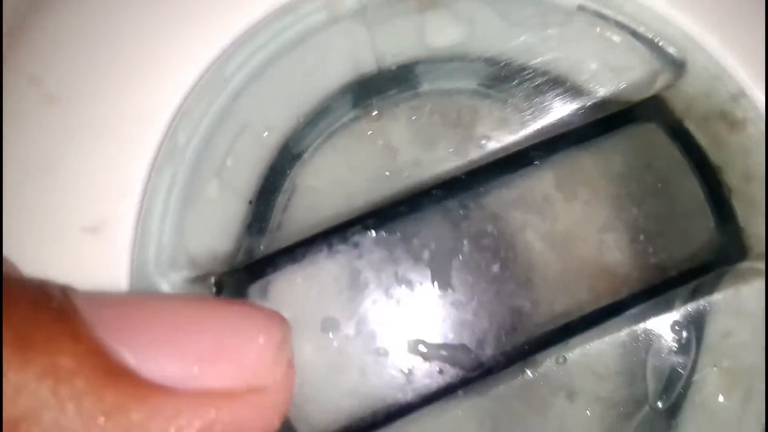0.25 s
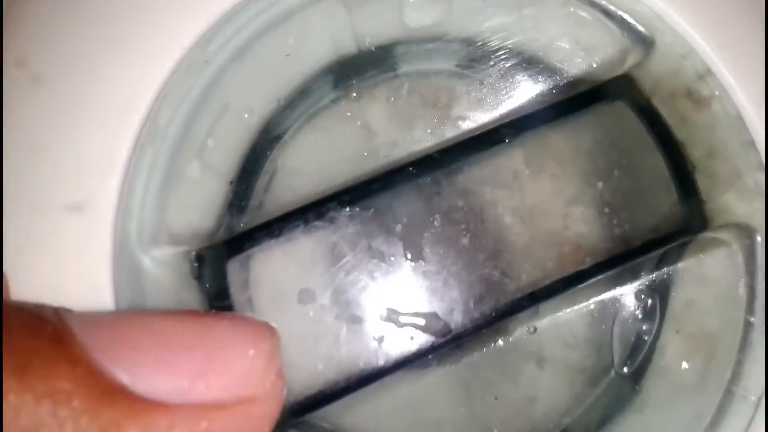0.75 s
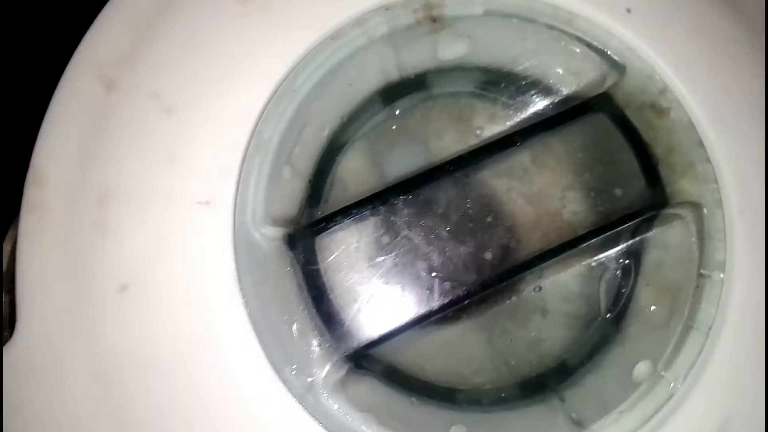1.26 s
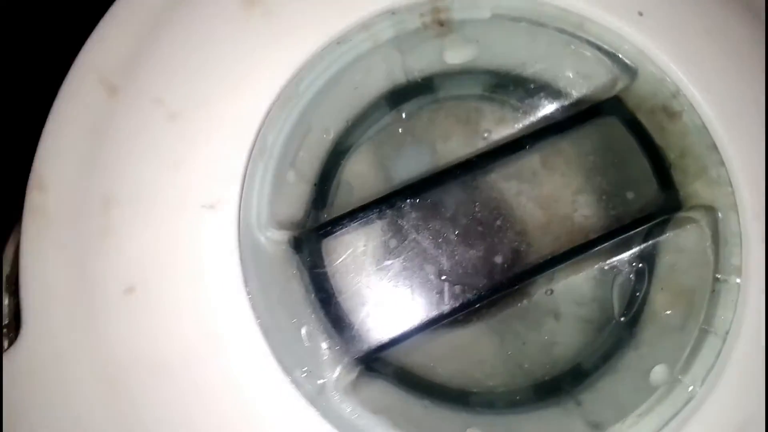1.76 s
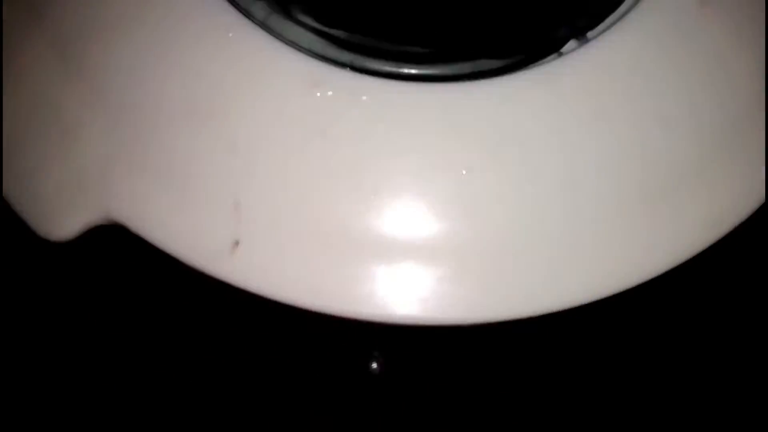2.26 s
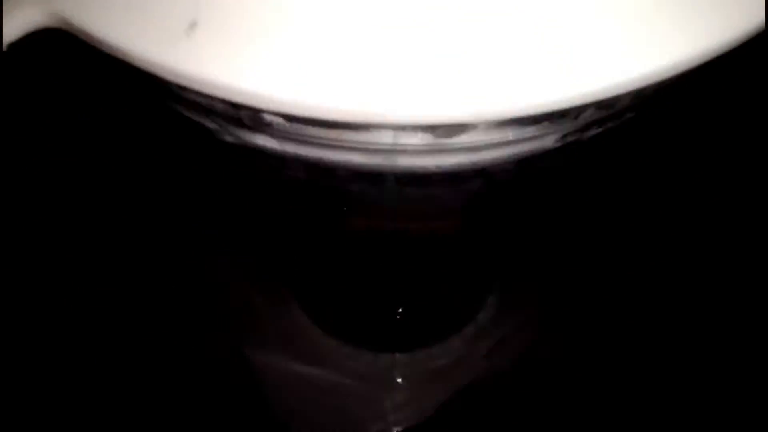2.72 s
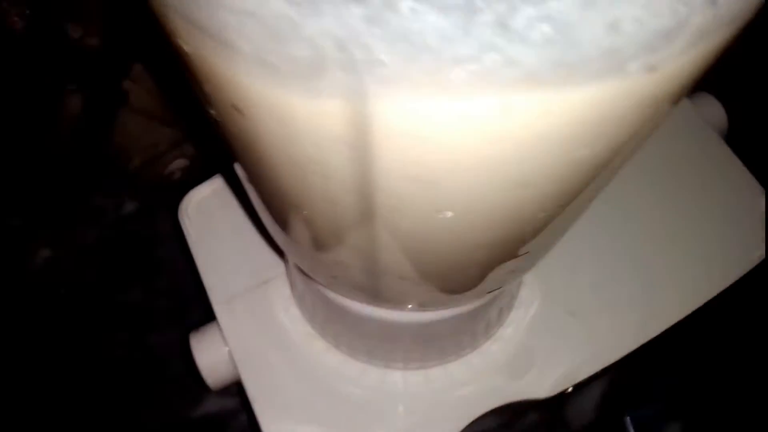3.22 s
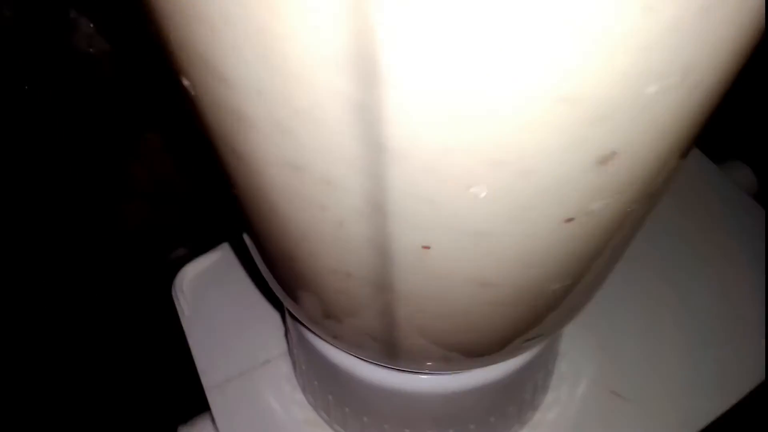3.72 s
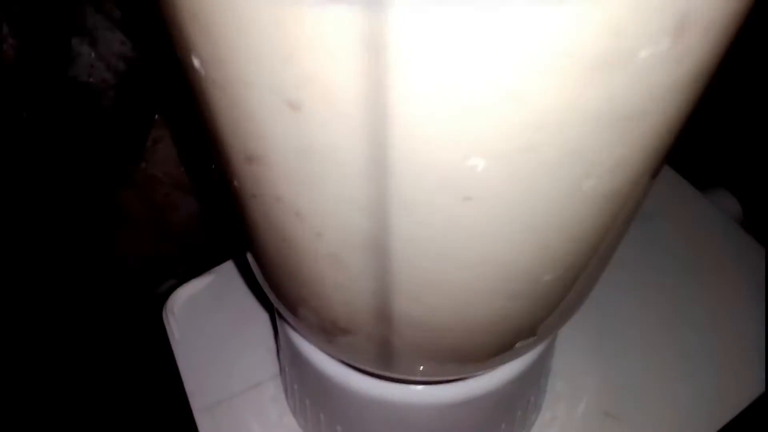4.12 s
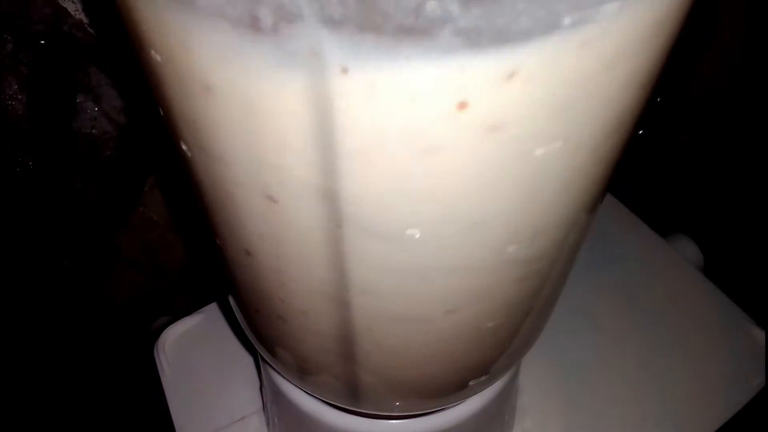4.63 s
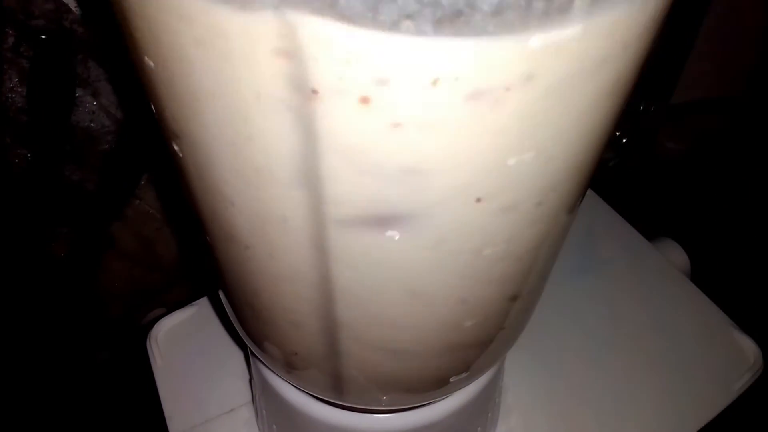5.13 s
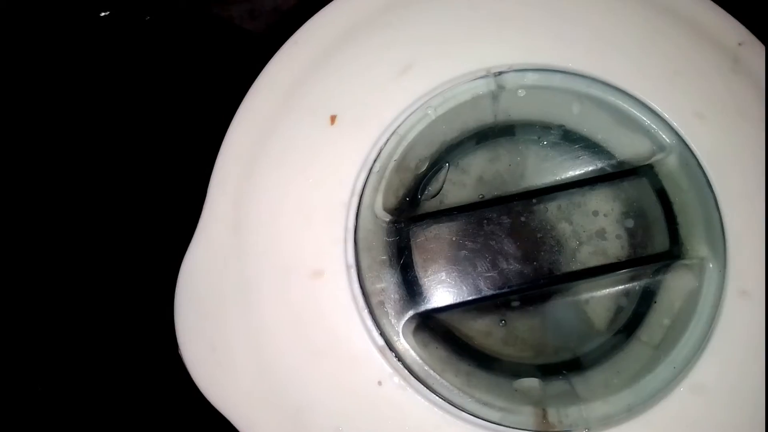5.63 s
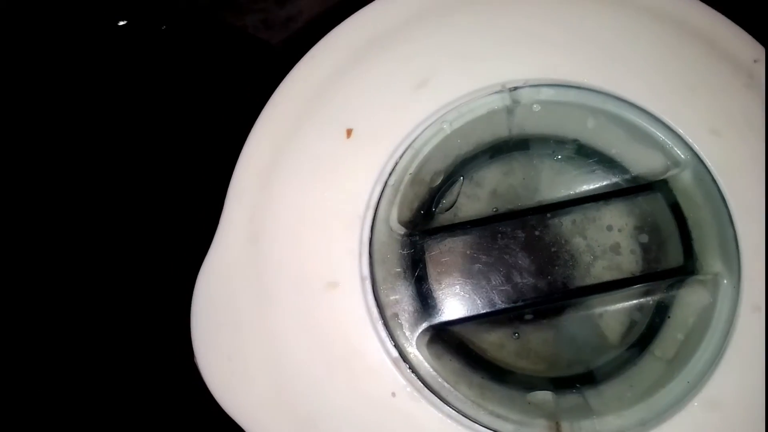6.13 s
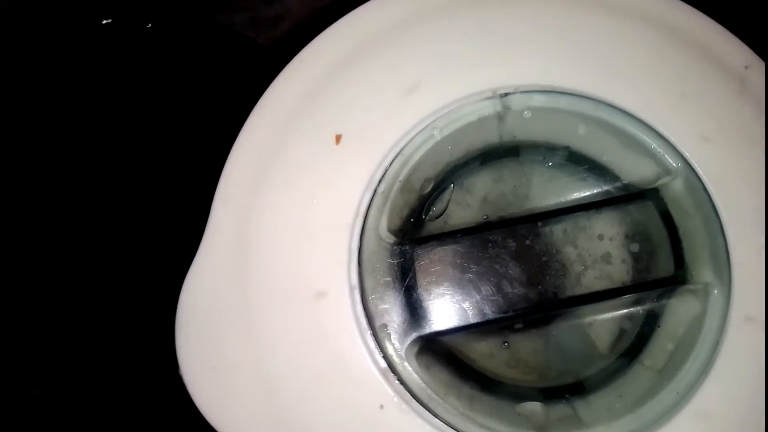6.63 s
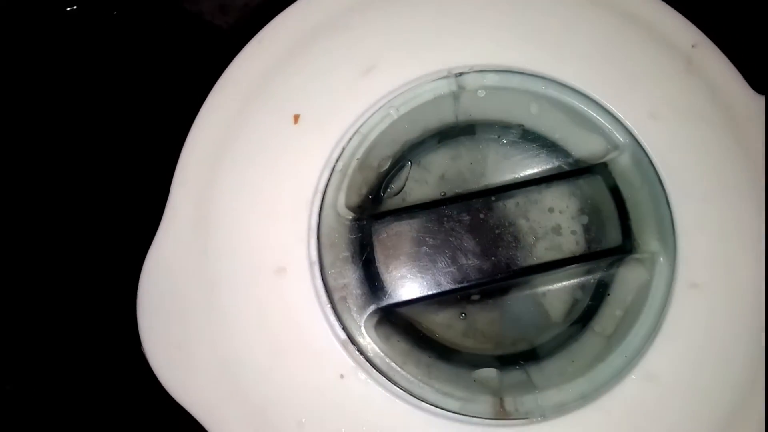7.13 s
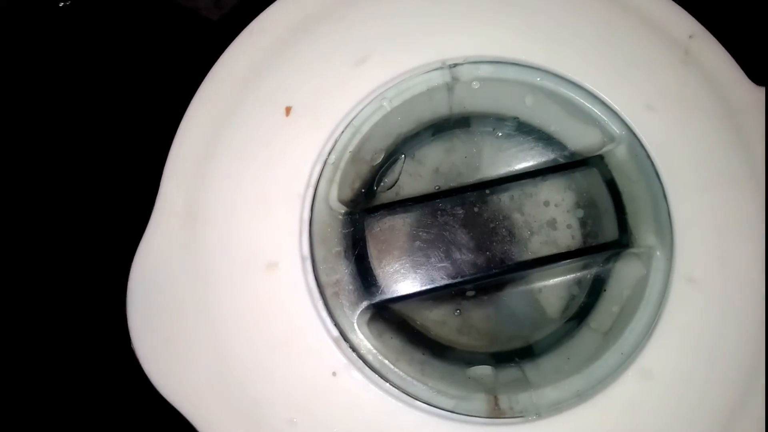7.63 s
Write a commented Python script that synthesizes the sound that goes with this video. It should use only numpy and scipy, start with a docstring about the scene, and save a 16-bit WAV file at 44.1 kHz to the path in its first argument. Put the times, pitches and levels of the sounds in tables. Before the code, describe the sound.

Close up, a blender whirs and grinds a lumpy liquid, drops briefly to silence, then runs more smoothly until it is switched off.

```python
"""In a kitchen, a blender runs at full speed while a close microphone moves from over the lid to the
side of the jug and back. The blades churn and grind, making the jug ring, in bursts when they strike
lumps. Droplets tick on the lid, the motor rumbles and hums, and its fan hisses. At the end the power
is cut and it starts to run down. The loudest peaks overload, and early on the sound cuts out for 0.8 s."""
import sys
import numpy as np
from scipy import signal
from scipy.fft import rfft, irfft, next_fast_len
from scipy.io import wavfile
from scipy.ndimage import map_coordinates

SR = 44100
rng = np.random.default_rng(int(sys.argv[2]) if len(sys.argv) > 2 else 0)


def put_to_file(sound):
    """Save the sound as 16-bit audio at rate SR, in the file named by the first command-line argument."""
    columns = np.atleast_2d(sound).T  # one column per channel
    safe = np.clip(columns, -1, 1)
    whole_steps = np.round(safe * 32767)
    wavfile.write(sys.argv[1], SR, whole_steps.astype(np.int16))


N = 347067
TIME = np.arange(N) / SR
POWER_OFF_S, COAST_S = 7.5, 0.7  # once off, the speed falls to about a third in COAST_S


# Pitches the jug and lid ring at, and how strong each is at the three microphone places.
# pitch_hz, width_hz, close_db, beside_db, above_db
JUG_RINGS = [(836, 162, -16.5, -15.5, -16), (1039.5, 84, -13.5, -15, -11.5), (1141, 340, -15.5, -20, -19),
             (1385, 76, -14, -5, -13), (1495.4, 53, -6, -4, -14), (1620, 55, -7.5, -4.5, -7.5),
             (1767, 63, -5, -4.5, -6), (1827, 95, -3.5, -3, -23), (1911.4, 65, 4, -1.5, 0),
             (1991, 62, -5, -12.5, -4.5), (2160, 120, -8, -11, -10), (2438, 210, -10.5, -23.5, -9),
             (2650, 58, -12.5, -19, -11.5), (2810.5, 130, -8.5, -21.5, -13.5), (2952, 26, -8.5, -19.5, -6),
             (3086, 98, -15.5, -13.5, -10), (3300, 110, -12.5, -26, -9.5), (3630, 213.4, -11, -7.5, -8),
             (3837, 230, -14.5, -2, -7.5), (4022, 130, -11, -2.5, -2), (4214, 98, -10, -9.5, -6),
             (4406, 238, -11.5, -9.5, -8.5), (4845, 290, -19, -15, -8.5), (5330, 220, -21.5, -18, -13.5),
             (5767, 110, -14.5, -21, -11.5)]

def blades_in_jug(lump_db, shaft_hz):
    """Swirling liquid, small hits and one knock per turn of the shaft make the jug ring."""
    turns = np.cumsum(shaft_hz + 3.5 * wobble(40)) / SR
    knocks = unit(np.diff(np.floor(turns), prepend=0) * amp(2.4 * wobble(300)))
    # Uneven blades: every other turn is louder.
    throb = 1 + .11 * np.cos(2 * np.pi * turns) + .12 * np.cos(np.pi * turns)
    swirl = throb * rng.standard_normal(N)
    churn = unit(swirl + .45 * ticks(900, 3.3) + .28 * knocks)
    roughness_db = at_place([1.1, .6, .5]) * (.65 * wobble(25) + 1.7 * wobble(90))
    churn *= amp(churning_db() + .98 * lump_db + roughness_db)
    return amp(16) * ring(churn, JUG_RINGS, sharpness=1.288, low_cut_hz=600, cut_slope=4)


# How the steady churning swells and sinks. time_s, level_db
CHURN_LEVEL = [(0, -13), (.6, -16), (.78, -16), (1.05, -13.5), (1.2, -11), (1.65, -9.5), (1.8, -11.5),
               (2.62, -9.5), (3.2, -9.5), (3.5, -9.5), (4.1, -8), (4.7, -9), (4.92, -11.5), (5.15, -9),
               (5.54, -8.5), (5.57, -11.5), (6.8, -11), (7.87, -11)]

def churning_db():
    """The churning loses 3.5 dB each time the blades' speed halves."""
    return curves(CHURN_LEVEL)[0] - 3.5 * speed_halvings()


# Big lumps caught by the blades. start_s, length_s, rise_db
BIG_LUMPS = [(0.016, 0.016, 10.5), (0.056, 0.023, 10.5), (0.09, 0.036, 6.5), (0.154, 0.0083, 8.5),
             (0.244, 0.0044, 6), (0.267, 0.02, 9.5), (0.306, 0.015, 8), (0.354, 0.017, 11.5),
             (0.404, 0.03, 7.5), (0.441, 0.062, 9.5), (0.491, 0.012, 3), (0.514, 0.011, 10),
             (0.568, 0.015, 12.5), (0.588, 0.026, 8), (0.619, 0.062, 14), (0.72, 0.0093, 10.5),
             (0.824, 0.024, 10.5), (0.873, 0.037, 6), (0.919, 0.0082, 10), (0.983, 0.023, 13.5),
             (1.038, 0.0081, 11), (1.104, 0.027, 8.5), (1.294, 0.0087, 6.5), (1.381, 0.023, 4),
             (1.417, 0.015, 4.5), (1.516, 0.017, 4), (3.421, 0.0061, 5), (3.504, 0.029, 4.5),
             (3.651, 0.047, 3), (3.932, 0.018, 2), (4.032, 0.049, 1), (4.123, 0.0224, 0.5),
             (4.191, 0.014, 2), (4.25, 0.045, 3), (4.372, 0.017, 3), (4.514, 0.015, 4), (4.658, 0.055, 2),
             (4.84, 0.009, 4.5), (4.917, 0.041, 7.5), (5.043, 0.061, 4.5), (6.972, 0.011, 4),
             (7.118, 0.0091, 5), (7.458, 0.011, 5)]
# Quieter moments when the blades spin free. start_s, length_s, change_db
FREE_SPINS = [(0.523, 0.033, -1.5), (1.241, 0.0205, -8), (4.149, 0.044, -6.5), (4.203, 0.03, -5.5),
              (5.199, 0.036, -3.5), (7.401, 0.051, -4)]

def lump_strikes_db():
    """Each lump cracks, holds the level up and lets go quickly; spinning free lowers the level."""
    rise, dip = np.zeros(N), np.zeros(N)
    for start, length, db in [*BIG_LUMPS, *small_lumps(count=110)]:
        span = slice(int(start * SR), int((start + length + .01) * SR))
        times = start + np.array([0, .0008, .003, .94 * length, length + .0013])
        strike = db * np.interp(TIME[span], times, [0, 1.09, 1, .65, 0])
        rise[span] = np.maximum(rise[span], strike)
    for start, length, db in FREE_SPINS:
        dip += np.interp(TIME - start, [0, .0033, length - .002, length], [0, db, db, 0])
    return rise + dip


# The most a small lump lifts the level at each microphone place. close_db, beside_db, above_db
SMALL_LUMP_RISE = [4, 2, 2]

def small_lumps(count):
    """Small lumps hit the blades at random times; the rows are like those of BIG_LUMPS."""
    when, duration, size = rng.random((count, 3)).T
    start_s = (np.arange(count) + when) / count * (N - 1) / SR
    length_s = .013 * np.exp(.7 * (2 * duration - 1))
    rise_db = at_place(SMALL_LUMP_RISE)[(start_s * SR).astype(int)] * size
    return zip(start_s, length_s, rise_db)


# The bright tone of the splashing. pitch_hz, level_db
SPLASH_TONE = [(5000, -51.5), (5900, 1), (6500, -3), (7200, -4.5), (7800, -3), (9000, -6.5), (10300, -17.5),
               (11300, -26), (12500, -36)]

def droplets(lump_db):
    """Droplets tick on the lid, louder when a lump is struck."""
    splash = rng.standard_normal(N) + 1.3 * ticks(300, 2.7)
    level_db = churning_db() + at_place([-19.5, -18.5, -18.5]) + lump_db + wobble(40)
    return amp(level_db) * unit(filtered(splash, tone_curve(SPLASH_TONE)))


# Pitches the motor base rings at. pitch_hz, width_hz, close_db, beside_db, above_db
BASE_RINGS = [(303, 54, 0, 2, 0.5), (349.4, 28, -6.5, -12, -9), (391.3, 21, -3, -1, 1),
              (444, 26, -6.5, -2.5, -0.5), (509, 63, -4.5, -3, -5), (581.7, 42, -11, -7, -8.5),
              (701, 59, -11.5, -4.5, -4.5)]
# The tone of the faint bass under the motor. pitch_hz, level_db
BASS_TONE = [(20, -3), (130, 0), (220, 0.5), (300, -26)]

def motor_rumble(lump_db):
    """The base rumbles over a faint bass, and feels the lumps more weakly than the jug does."""
    rumble = unit(ring(rng.standard_normal(N), BASE_RINGS, sharpness=1.15, low_cut_hz=255, cut_slope=5))
    bass = amp(-24 + 2.7 * wobble(22)) * shaped_noise(BASS_TONE)
    level_db = curves(CHURN_LEVEL)[0] + at_place([-16.5, -22, -17.5]) + .75 * lump_db
    return amp(level_db + 1.6 * wobble(12)) * (rumble + bass)


# The motor's hum while the power is on. time_s, level_db
MOTOR_HUM = [(0, -42), (1.8, -46), (2.62, -37.5), (5.2, -41), (5.54, -35), (5.58, -29.5), (6.6, -29),
             (7.5, -31.5)]
# The note of the spinning shaft. time_s, level_db
SHAFT_LEVEL = [(0, -43), (1.2, -44.5), (1.35, -33.5), (1.75, -37), (2.62, -46.5), (3.2, -40), (7.42, -46),
               (7.47, -29), (7.75, -34), (7.87, -56)]

def motor_tones(shaft_hz, hum_hz=519.6, fade_db_per_s=600):
    """The motor hums until the power is cut, and the shaft's note follows its speed."""
    hum_db = curves(MOTOR_HUM)[0] - fade_db_per_s * np.maximum(TIME - POWER_OFF_S, 0)
    hum = tone(hum_hz, hum_db, waver_hz=2.97, flutter_db=1.5)
    shaft = tone(shaft_hz, *curves(SHAFT_LEVEL), waver_hz=4.5, flutter_db=1.6)
    return hum + shaft


# The thin tone of the fan's air. pitch_hz, level_db
FAN_TONE = [(9000, -35), (10000, -9), (11200, -11), (11800, -6), (12800, -7.5), (14200, -3.5), (15200, -8),
            (15700, -6), (15900, -30.5)]
# How the fan's hiss swells and sinks. time_s, level_db
FAN_LEVEL = [(0, -44), (.9, -45.5), (1.25, -41), (1.8, -38.5), (2.62, -41.5), (3.2, -40), (3.45, -49),
             (4.4, -48.5), (5.5, -51), (7.5, -53)]

def cooling_fan(lump_db):
    """Air hisses through the fan, losing 11 dB each time the speed halves."""
    air = shaped_noise(FAN_TONE)
    level_db = curves(FAN_LEVEL)[0] - 11 * speed_halvings() + 1.1 * lump_db
    return amp(level_db + 1.2 * wobble(23)) * air


# A faint thin whistle. time_s, pitch_hz, level_db
WHISTLE = [(3.6, 8700, -84), (3.85, 8750, -60), (4.2, 8730, -56), (4.27, 8730, -44), (4.36, 8730, -58.5),
           (4.7, 8830, -64), (5.2, 8730, -82)]

def faint_whistle():
    """A faint thin whistle near 8.7 kHz comes and goes about halfway through."""
    return tone(*curves(WHISTLE), waver_hz=90, flutter_db=5)


# How the liquid's treble changes above a moving pitch. time_s, edge_hz, change_db
TREBLE_EDGE = [(0, 6980, 1), (3.22, 7000, -4), (3.46, 6750, -16), (3.8, 6130, -19), (5.54, 5930, -17),
               (5.57, 5790, -15), (7.74, 5810, -12.5), (7.87, 5100, -16)]

def muffle(sound):
    """The treble above a sharp edge sinks, so the sound grows duller."""
    hz, times, spectrum = signal.stft(sound, SR, nperseg=1024, noverlap=768)
    time_s, edge_hz, change_db = np.transpose(TREBLE_EDGE)
    treble = amp(np.interp(times, time_s, change_db))
    below_edge = 1 / (1 + (hz[:, None] / np.interp(times, time_s, edge_hz)) ** 100)
    gain = treble + (1 - treble) * below_edge
    return signal.istft(spectrum * gain, SR, nperseg=1024, noverlap=768)[1][:N]


# The microphone's path. time_s, place (0 close over the lid, 1 beside the jug, 2 above the lid)
MIC_PATH = [(0, 0), (1.8, 0.2941), (2.62, 0.18), (3.1, 0.33), (3.45, 0.4), (5.55, 1), (5.57, 1.91),
            (7.87, 2)]

def at_place(values):
    """Blend three values, one for each place, as the microphone moves."""
    return np.interp(curves(MIC_PATH)[0], np.arange(3), values)


def ring(sound, rings, sharpness, low_cut_hz, cut_slope):
    """A hollow body boosts the pitches it rings at; each place hears its own mix of them."""
    pitches, widths, *levels_by_place = np.transpose(rings)
    heard = np.zeros(N)
    for this_place, levels in zip(np.eye(3), levels_by_place):
        def gain(hz):
            power = sum(amp(2 * db) / (1 + (2 * (hz - pitch) / width) ** 2) ** sharpness
                        for pitch, width, db in zip(pitches, widths, levels))
            return np.sqrt(power) / (1 + (low_cut_hz / (hz + 1)) ** cut_slope)
        heard += at_place(this_place) * filtered(sound, gain)
    return heard


def speed_halvings():
    """How many times the shaft's speed has halved since the power was cut."""
    return np.maximum(TIME - POWER_OFF_S, 0) / COAST_S / np.log(2)


def tone(hz, db, waver_hz, flutter_db):
    """A pure note, slightly unsteady in level and pitch."""
    level = np.sqrt(2) * amp(db + flutter_db * wobble(14))
    cycles = np.cumsum(hz + waver_hz * wobble(30)) / SR
    return level * np.sin(2 * np.pi * cycles)


def ticks(per_s, spread_db):
    """Scattered ticks of uneven size."""
    hits = rng.random(N) < per_s / SR
    sizes = amp(spread_db * rng.standard_normal(N))
    return unit(hits * sizes * np.sign(rng.standard_normal(N)))


def shaped_noise(points):
    """Steady noise with the tone given by (pitch_hz, level_db) points."""
    return unit(filtered(rng.standard_normal(N), tone_curve(points)))


def tone_curve(points):
    """Join (pitch_hz, level_db) points into a gain curve that is silent outside them."""
    pitches, db = np.transpose(points)
    return lambda hz: amp(np.interp(np.log(hz + 1), np.log(pitches), db, left=-120, right=-120))


def filtered(sound, gain):
    """Scale each pitch by gain(hz), so that ringing comes after a hit and never before it."""
    size = 2 * next_fast_len(N // 2 + SR // 4)
    cepstrum = irfft(np.log(gain(np.fft.rfftfreq(size, 1 / SR)) + 1e-6), size)
    cepstrum[1:size // 2] *= 2  # fold the part before the hit onto the part after it
    cepstrum[size // 2 + 1:] = 0
    return irfft(rfft(sound, size) * np.exp(rfft(cepstrum)), size)[:N]


def wobble(per_s):
    """A smooth curve through per_s random points a second."""
    return map_coordinates(rng.standard_normal(int(N * per_s / SR) + 4), [TIME * per_s])


def curves(rows):
    """One value per sample for each column after the time."""
    time_s, *columns = np.vstack(rows).T
    return [np.interp(TIME, time_s, column) for column in columns]


def amp(db):
    """Turn decibels into a multiplier."""
    return 10 ** (np.asarray(db) / 20)


def unit(sound):
    """Scale a sound to an average power of one."""
    return sound / np.sqrt(np.mean(sound ** 2) + 1e-20)


def scene(full_speed_hz=324.2, wander_hz=14):
    """The same lumps and the same spinning shaft drive both the jug and the motor."""
    lump_db = lump_strikes_db()
    load_pull_hz = wander_hz * wobble(2.5) * np.clip(POWER_OFF_S - TIME, 0, 1)
    shaft_hz = (full_speed_hz + load_pull_hz) / 2 ** speed_halvings()
    liquid = muffle(blades_in_jug(lump_db, shaft_hz) + droplets(lump_db))
    motor = motor_rumble(lump_db) + motor_tones(shaft_hz)
    return (liquid + motor + faint_whistle() + cooling_fan(lump_db))[None]


def record(dry):
    """The microphone flattens loud peaks, cuts out once, thins the bass and loses the highest treble."""
    mute_s, unmute_s, bass_hz, top_hz = 1.8225, 2.6215, 190, 15900
    sound = dry / (1 + abs(dry) ** 30) ** (1 / 30)  # overload
    sound *= np.interp(TIME, [mute_s - .001, mute_s, unmute_s, unmute_s + .001], [1, 0, 0, 1])
    bass = signal.sosfiltfilt(signal.butter(2, bass_hz, fs=SR, output="sos"), sound)
    treble_cut = signal.ellip(14, .1, 60, top_hz, fs=SR, output="sos")
    return np.clip(signal.sosfiltfilt(treble_cut, sound - .35 * bass), -1, 1)


dry = scene()
out = record(dry)
put_to_file(out)
```